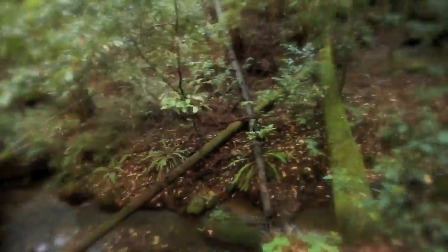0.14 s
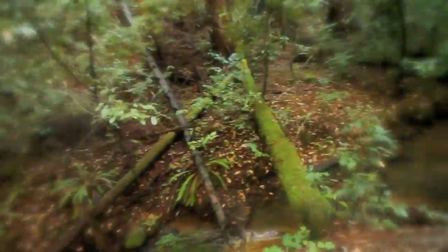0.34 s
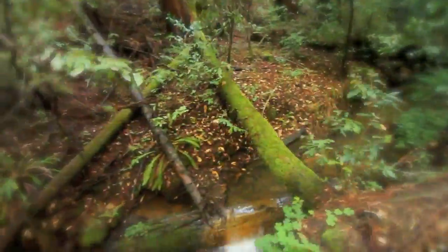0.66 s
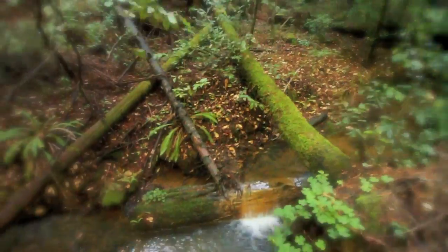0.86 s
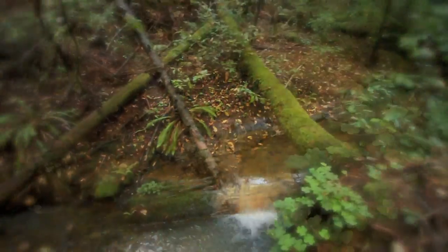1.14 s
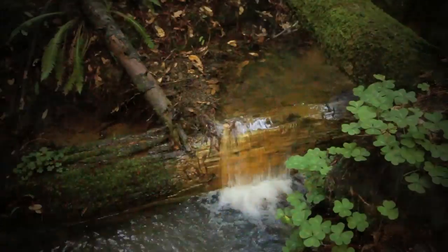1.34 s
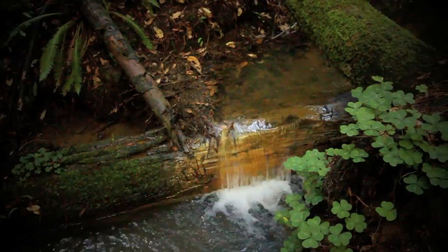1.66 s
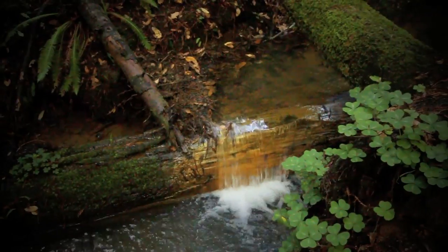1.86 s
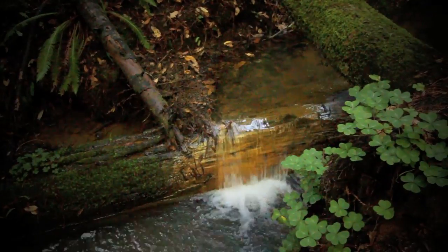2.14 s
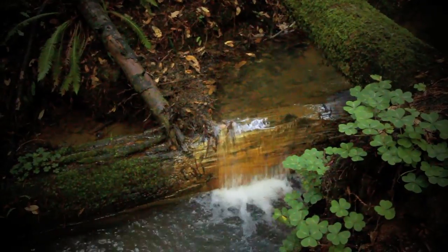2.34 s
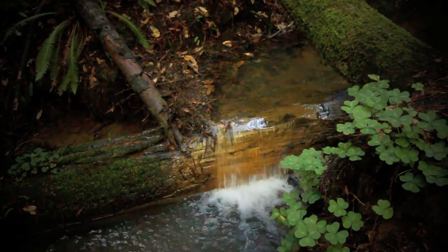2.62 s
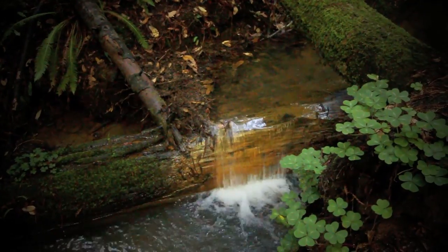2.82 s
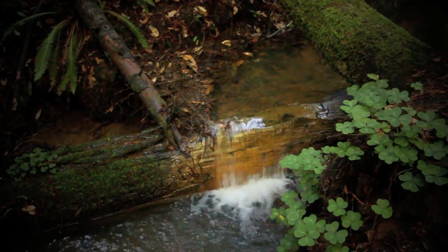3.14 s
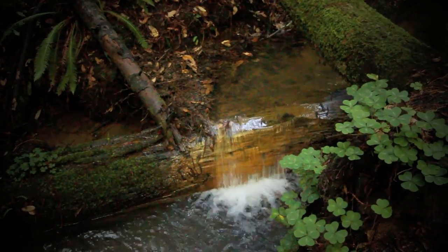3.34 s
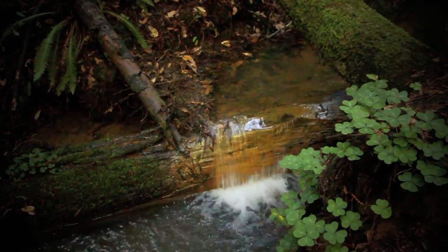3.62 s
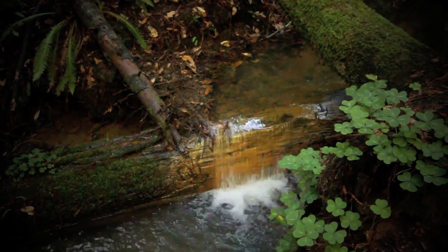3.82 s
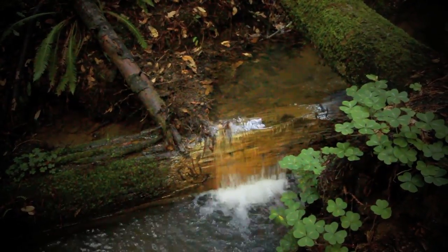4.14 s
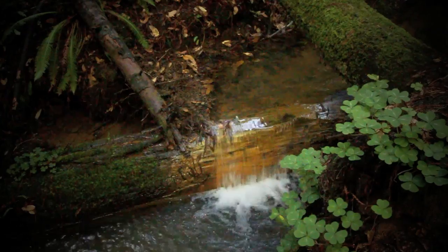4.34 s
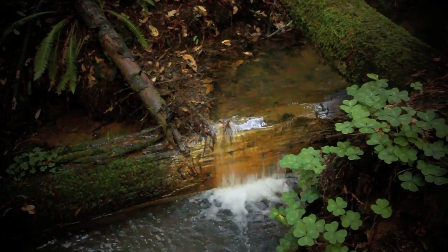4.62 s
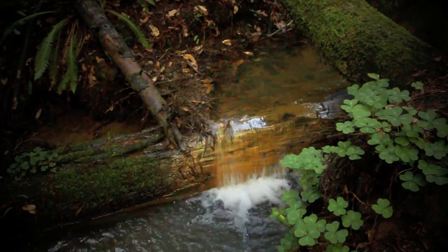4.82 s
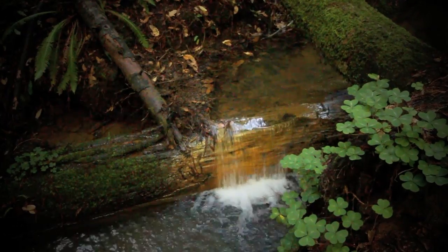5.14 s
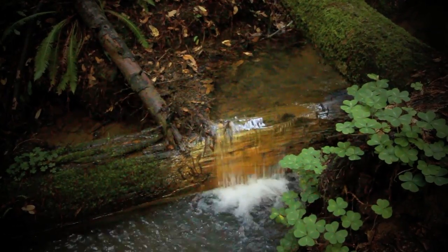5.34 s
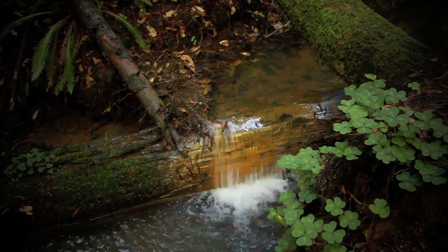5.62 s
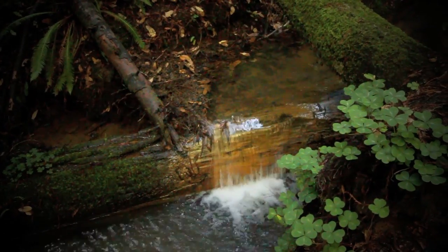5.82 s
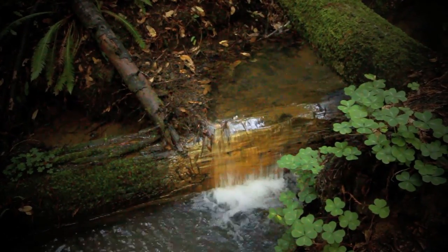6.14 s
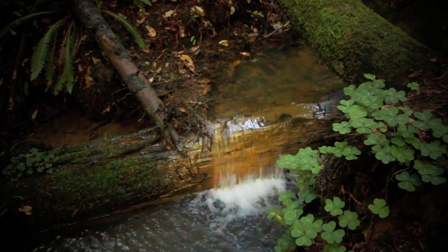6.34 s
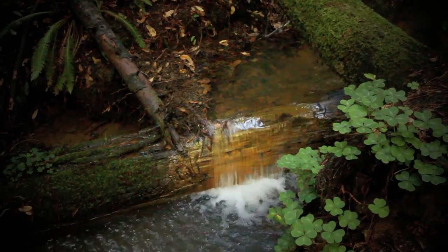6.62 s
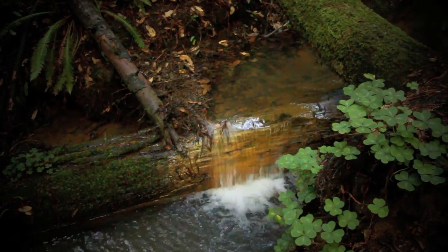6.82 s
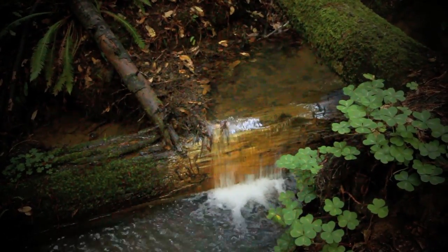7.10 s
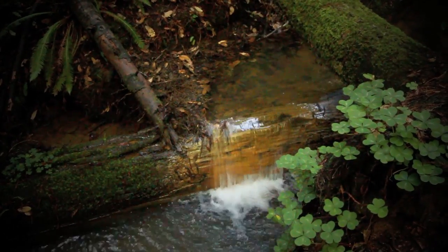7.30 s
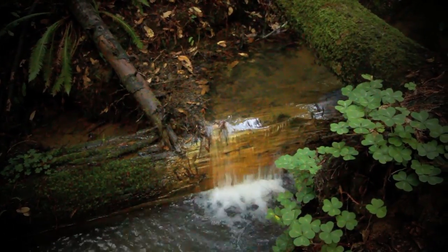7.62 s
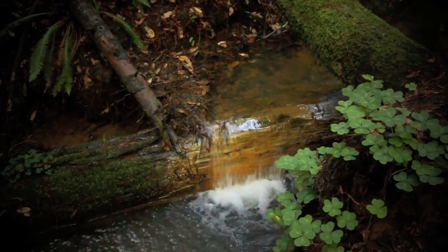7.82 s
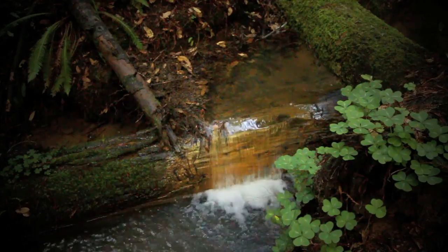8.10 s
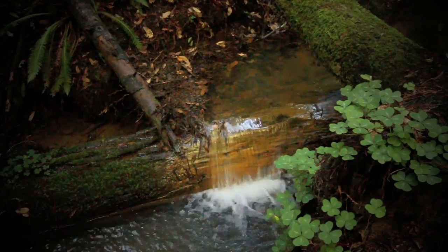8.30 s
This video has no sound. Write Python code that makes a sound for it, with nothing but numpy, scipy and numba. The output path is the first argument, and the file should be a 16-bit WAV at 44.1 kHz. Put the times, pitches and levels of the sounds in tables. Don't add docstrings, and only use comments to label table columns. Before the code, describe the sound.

A mono microphone swings toward water pouring off a log. Tiny squeaks come first, then a few dull knocks over brightening, slightly hollow spatter. After about a second it cross-fades to a fixed spot near the pool: louder, dense, full-range rushing with hissing spray, random high plinks, mid bloops and faint deep gulps, continuing without fading.

```python
import sys
import numpy as np
from scipy import signal
from scipy.fft import rfft, irfft, next_fast_len
from scipy.io import wavfile
from numba import njit

SR = 44100
rng = np.random.default_rng(int(sys.argv[2]) if len(sys.argv) > 2 else 0)


def waveform_to_disk(signal):
    frames = np.transpose(np.atleast_2d(signal))
    scaled = np.clip(frames, -1, 1) * 32767
    samples = np.round(scaled).astype(np.int16)
    wavfile.write(sys.argv[1], SR, samples)


def volts(x):
    e = np.asarray(x, float) / 20
    return 10 ** e


N = 373086


def in_time(rows):
    s, *columns = np.transpose(rows)
    return [np.interp(np.arange(N) / SR, s, c) for c in columns]


def rms_one(x):
    return x / np.sqrt(np.mean(x ** 2) + 1e-20)


def drift(rate_hz):
    pole = np.exp(-40 * np.pi * rate_hz / SR)
    noise = rng.standard_normal(N // 20 + 4002)
    slow = signal.lfilter([1], [1, -2 * pole, pole * pole], noise)[4000:]
    return np.interp(np.arange(N) / 20, np.arange(len(slow)), rms_one(slow))


def colour(x, points, modes=()):
    size = next_fast_len(N)
    hz = np.maximum(np.arange(size // 2 + 1) * SR / size, 1)
    point_hz, point_db = np.transpose(points)
    gain = volts(np.interp(np.log(hz), np.log(point_hz), point_db))
    for mode_hz, width_hz, mode_db in modes:
        gain = gain * (1 + volts(mode_db) / (1 + (2 * (hz - mode_hz) / width_hz) ** 2))
    return rms_one(irfft(rfft(x, size) * gain, size)[:N])


@njit
def ring(n, peak, step, size, cycles, rise):
    out = np.zeros(n)
    for k in range(len(peak)):
        tau = cycles[k] / step[k]
        start = int(peak[k] - tau)
        for i in range(max(0, -start), min(int(7 * tau), n - start)):
            u = i / tau
            turns = step[k] * i * (1 + rise[k] * (u / 2 - 1))
            out[start + i] += size[k] * u * np.exp(1 - u) * np.sin(2 * np.pi * turns)
    return out


@njit
def dip(x, step, depth, width):
    out, y1, y2, r = x.copy(), 0., 0., np.exp(-np.pi * width)
    for i in range(2, len(x)):
        y = (1 - r * r) / 2 * (x[i] - x[i - 2]) + 2 * r * np.cos(2 * np.pi * step[i]) * y1 - r * r * y2
        out[i] -= (1 - depth[i]) * y
        y1, y2 = y, y1
    return out


def water(per_s, spread_db, cycles, rise, hiss_db, slaps_per_s, slap, surge_db, flutter_db):
    pool_size = 90000
    when, pitch, kept, loud, long, climb = rng.random((pool_size, 6)).T
    hz = 100 + 17000 * pitch ** 2
    size = hz ** .75 * volts(-spread_db * np.log(1 - .99 * loud))
    size = size * (kept * pool_size * SR / N < per_s)
    cloud = ring(N, when * N, hz / SR, size, cycles * (.6 + 2.5 * long ** 3), rise * climb)
    # treble of the hiss flares, 1.5 ms decay
    slaps = (rng.random(N) < slaps_per_s / SR) * slap * np.minimum(rng.exponential(1, N), 3)
    flare = signal.lfilter([1], [1, -np.exp(-1 / (0.0015 * SR))], slaps)
    hiss = rng.standard_normal(N)
    treble = signal.sosfilt(signal.butter(1, 2500, "high", fs=SR, output="sos"), hiss)
    hiss = hiss + treble * flare
    swell = volts(surge_db * drift(17) + flutter_db * drift(60))
    return rms_one((rms_one(cloud) + volts(hiss_db) * hiss) * swell)


def fade():
    start_s, end_s = 1.076, 1.525
    return np.clip((np.arange(N) / SR - start_s) / (end_s - start_s), 0, 1)


def side_noise():
    # t/s, f/Hz
    bursts = [(1.316, 13100), (1.409, 4930), (1.478, 12360), (1.479, 9650), (2.037, 6290), (2.037, 8930),
              (2.037, 10450), (2.037, 12360), (2.316, 8350), (3.756, 8220), (5.38, 9650), (5.38, 13400),
              (6.1, 11720), (7.261, 6930), (7.4, 6930), (7.401, 15000), (7.471, 13740)]
    frame, grid = 2048, 738
    width_hz, level_db, level_db_per_khz = 1400, -39.5, -0.15
    side, half = np.zeros(N), frame // 2
    window = signal.windows.kaiser_bessel_derived(frame, 4 * np.pi)
    for s, hz in bursts:
        low_bin = int((hz - width_hz / 2) * frame / SR)
        high_bin = int((hz + width_hz / 2) * frame / SR)
        bins = np.arange(low_bin, high_bin)
        cosines = np.cos(np.pi / half * np.outer(np.arange(frame) + .5 + half / 2, bins + .5))
        burst = rms_one(cosines @ rng.standard_normal(len(bins))) * window
        at = round((s * SR - grid) / half - 1) * half + grid
        side[at:at + frame] += volts(level_db + level_db_per_khz * hz / 1000) * burst
    return side


def knocks():
    # t/s, body f/Hz, peak level/dB
    blow_table = [
        (.177, 800, -39),
        (.357, 700, -35),
        (.415, 700, -38.5),
        (.583, 600, -38),
        (.894, 190, -45),
        (0.892, 600, -43),
    ]
    s, hz, peak_db = np.transpose(blow_table)
    cycles, no_rise = np.full(len(s), .45), np.zeros(len(s))
    peak = s * SR + cycles * SR / hz
    blows = np.zeros(N)
    for ratio, db in [(1, 0), (2.3, 1.5)]:
        blows += ring(N, peak, ratio * hz / SR, volts(peak_db + db), cycles, no_rise)
    return signal.sosfilt(signal.butter(3, 170, "high", fs=SR, output="sos"), blows)


def squeaks():
    # centre t/s, f/Hz, length/s, first partial level/dB, second partial level/dB
    slips = [
        (0.014, 1130, 0.013, -34, -43),
        (.061, 980, .018, -40, -33),
        (0.076, 820, 0.022, -44, -55),
        (0.106, 784, 0.018, -44, -43),
        (.116, 1150, .014, -55, -46),
    ]
    out, t = np.zeros(N), np.arange(N) / SR
    for s, hz, length_s, first_db, second_db in slips:
        u = np.clip((t - s) / length_s, -.5, .5)
        phase = 2 * np.pi * hz * length_s * (u - 0.098 * u ** 2)
        partials = volts(first_db) * np.sin(phase) + volts(second_db) * np.sin(2 * phase)
        out += np.cos(np.pi * u) * partials
    return out


def far_fall():
    # f/Hz, level/dB (per Hz)
    far_points = [(20, -62), (60, -42), (280, -26), (400, -13), (650, -7.5), (800, -9.5), (1300, -5),
                  (2400, -2), (3600, -4), (5100, -4), (7450, -5.5), (10000, -7), (12200, -7), (15700, -9)]
    # t/s, level/dB, first echo dip f/Hz, dip gain/dB
    swing = [
        (0, -37.5, 2600, -5),
        (.2, -35.5, 2380, -6),
        (.36, -34, 2180, -15),
        (.47, -33.5, 1870, -3),
        (.6, -32, 1750, -8),
        (.75, -31, 1620, -12),
        (.84, -31.5, 1430, -12),
        (.92, -30, 1300, -6),
        (1.15, -30, 1240, -5),
    ]
    level_db, first_hz, first_db = in_time(swing)
    t = np.minimum(np.arange(N) / SR, swing[-1][0])
    x = water(per_s=4600, spread_db=2.0, cycles=2.42, rise=0.132, hiss_db=4.5,
              slaps_per_s=39, slap=0.43, surge_db=0.34, flutter_db=0.0)
    x = colour(x, far_points)
    tilt_db = 0.1 - 2 * (t - 0.59) ** 2
    low = signal.sosfilt(signal.butter(1, 3000, fs=SR, output="sos"), x)
    x = low + (x - low) * volts(2 * tilt_db)
    first_db = first_db + 1.5 * drift(12)
    second_hz = np.maximum(5800 - 3050 * t, 3200)
    second_db = -0.5 - 6 * t
    ridge_db = 1.5 * np.clip((t - .35) / .2, 0, 1)
    for hz, gain_db, width_hz in [(first_hz, first_db, 480),
                                  (second_hz, second_db, 650),
                                  (1.5 * second_hz, np.full(N, -0.5), 500),
                                  (np.full(N, 2600), ridge_db, 800)]:
        x = dip(x, hz / SR, volts(gain_db), width_hz / SR)
    return volts(level_db) * (1 - fade()) * x


def lesser_pops():
    pool_size, per_s, low_hz, high_hz = 300, 8, 395, 14600
    level_db, spread_db, knee_hz, low_loss_db_per_oct = -21.5, 4, 4000, 2.5
    when, pitch, loud, kept = rng.random((pool_size, 4)).T
    hz = low_hz * (high_hz / low_hz) ** np.sqrt(pitch)
    peak_db = level_db + spread_db * (2 * loud - 1)
    peak_db = peak_db + low_loss_db_per_oct * np.log2(np.minimum(hz / knee_hz, 1))
    share = fade()[(when * N).astype(int)] * (kept * pool_size * SR / N < per_s)
    return when * N / SR, hz, volts(peak_db) * share


def pops():
    # t/s, f/Hz, peak level/dB
    bubbles = [(0.418, 3160, -32), (0.8853, 1940, -29), (1.1672, 11890, -21), (1.5042, 3100, -23),
               (1.824, 9470, -17), (2.0506, 4050, -16), (2.2541, 12060, -14), (2.2786, 8610, -14),
               (2.652, 4710, -16.5), (2.9272, 1300, -23), (3.0425, 4360, -16), (3.7863, 12750, -14),
               (3.9042, 13440, -13), (4.2275, 1220, -22), (4.5943, 8790, -13), (4.7331, 3540, -16.5),
               (4.9587, 2930, -16), (5.041, 1240, -22), (5.2724, 4770, -16), (5.5655, 1700, -22.5),
               (5.9086, 4080, -16), (6.4718, 3350, -13), (6.579, 8790, -14), (6.7579, 11020, -11),
               (7.257, 1580, -21), (7.3341, 12750, -12), (7.7596, 10510, -13), (7.9091, 12400, -13),
               (7.9494, 12400, -14), (8.0396, 3140, -18),
               (0.4862, 990, -42), (0.9912, 1180, -39), (1.5296, 1830, -23), (1.5311, 830, -29),
             (1.7052, 1060, -27), (1.9908, 422, -30), (2.07, 1950, -18), (2.3859, 1060, -28),
             (2.572, 2340, -20), (2.574, 484, -29.5), (2.9753, 440, -32), (3.122, 525, -29),
             (3.5244, 2350, -24), (3.645, 465, -31), (4.2304, 1940, -26), (5.1926, 760, -25),
             (5.915, 480, -31), (5.935, 480, -30), (5.97, 1500, -22), (6.065, 2000, -20),
             (6.1184, 508, -31), (6.5016, 1870, -21), (6.5393, 2050, -21), (6.6932, 780, -30),
             (6.8847, 1030, -26), (7.918, 506, -29), (8.06, 970, -25)]
    s, hz, peak_db = np.transpose(np.array(bubbles))
    s, hz, size = np.hstack([[s, hz, volts(peak_db)], lesser_pops()])
    cycles, rise = 3.15 * (hz / 3000) ** -.05, np.full(len(s), .04)
    out = ring(N, s * SR, hz / SR, size * volts(-2.0), cycles, rise)
    crack_size = size * volts(-11.0) * np.minimum(hz / 7000, 1)
    for ratio in (.65, 1.3):
        out += ring(N, s * SR, ratio * hz / SR, crack_size, 0.37 * cycles, rise)
    return out


def near_fall():
    # f/Hz, level/dB (per Hz)
    near_points = [(30, -40), (98, -12.5), (156, -7.5), (238, -11.5), (400, -2.5), (700, -2.5), (1300, 0),
                   (2500, -3), (3500, -0.5), (6300, -5), (9800, -8), (12400, -4), (14200, -8.5),
                   (15700, -13.5)]
    # f/Hz, width/Hz, level/dB
    pockets = [
        (170, 30, -4),
        (309, 34, -10.5),
        (392, 32, -11),
        (528, 81, -7.5),
        (8700, 900, -24),
    ]
    x = water(per_s=6000, spread_db=2.5, cycles=3.198, rise=0.1328, hiss_db=3.5,
              slaps_per_s=36, slap=0.47, surge_db=0.33, flutter_db=0.36)
    return volts(-24.5) * fade() * colour(x, near_points, pockets)


def scene():
    mono = knocks() + squeaks() + far_fall() + pops() + near_fall()
    return np.array([mono, mono])


def band_limit(x):
    return signal.sosfilt(signal.butter(12, 16430, fs=SR, output="sos"), x)


def record(dry):
    size = next_fast_len(N)
    hz = np.arange(size // 2 + 1) * SR / size
    cut = irfft(rfft(dry, size) * (hz < 15730), size)[:, :N]
    mix = cut + side_noise() * [[1], [-1]]
    return band_limit(mix)


dry = scene()
out = record(dry)
waveform_to_disk(out)
```